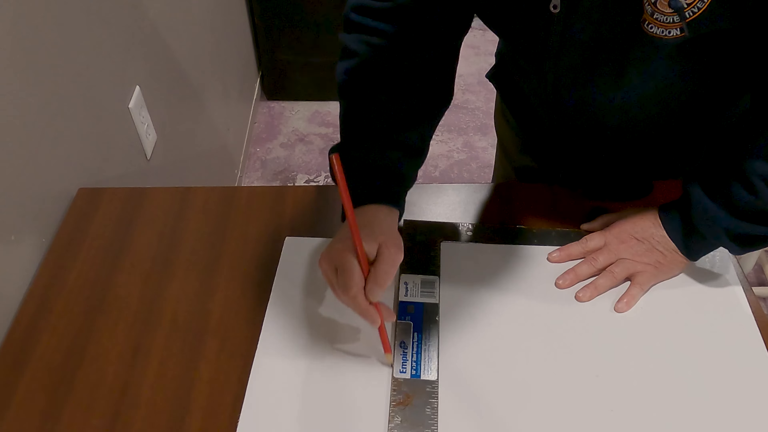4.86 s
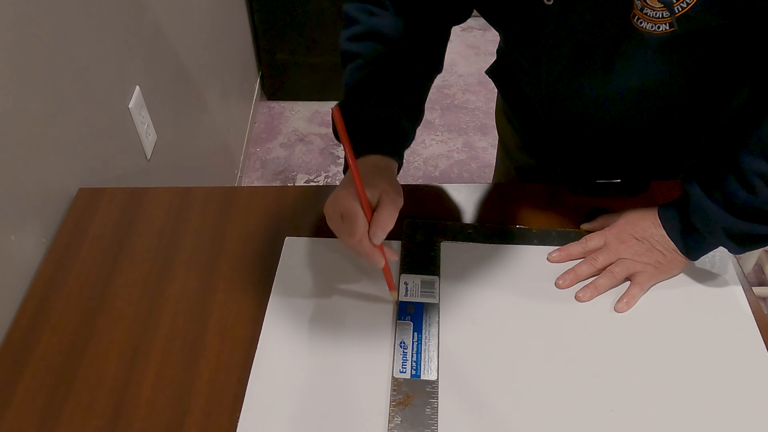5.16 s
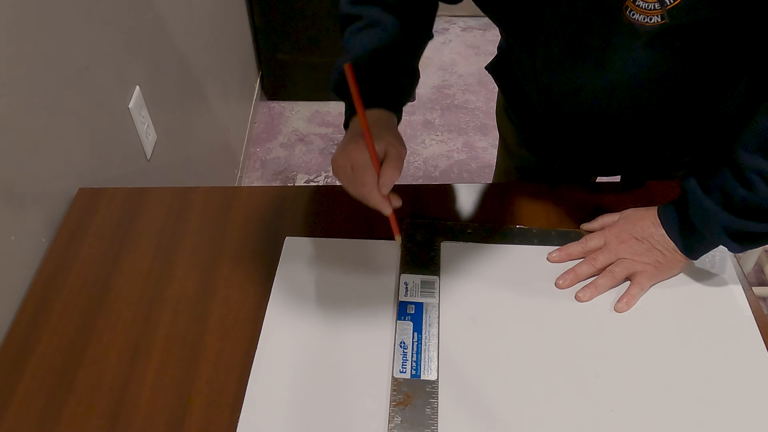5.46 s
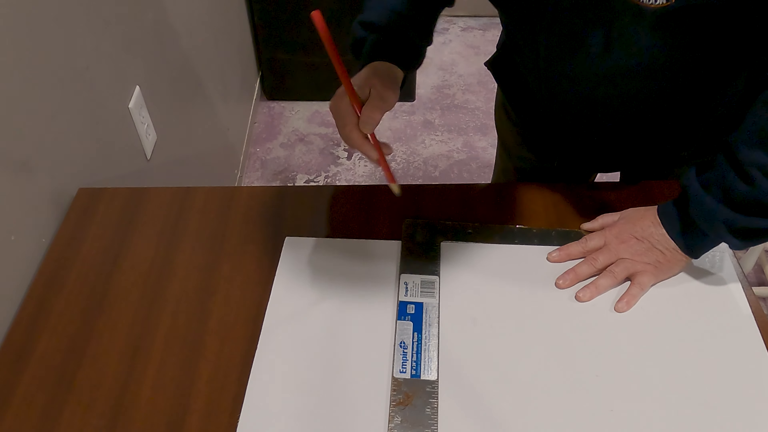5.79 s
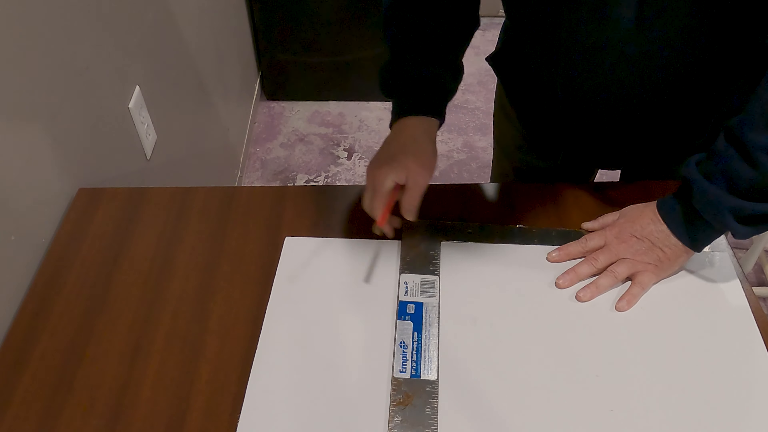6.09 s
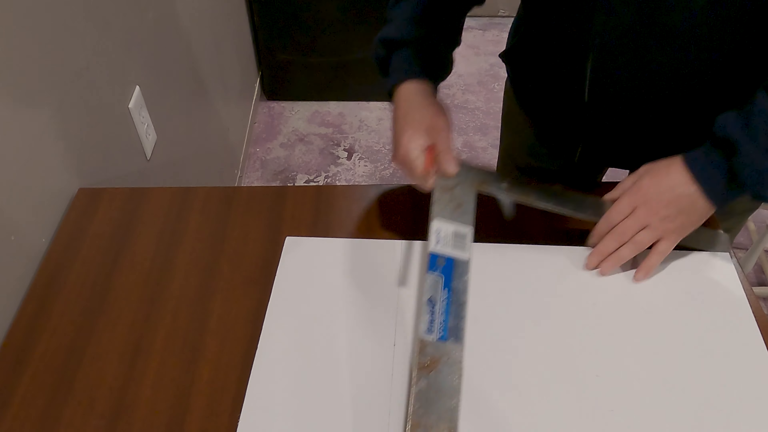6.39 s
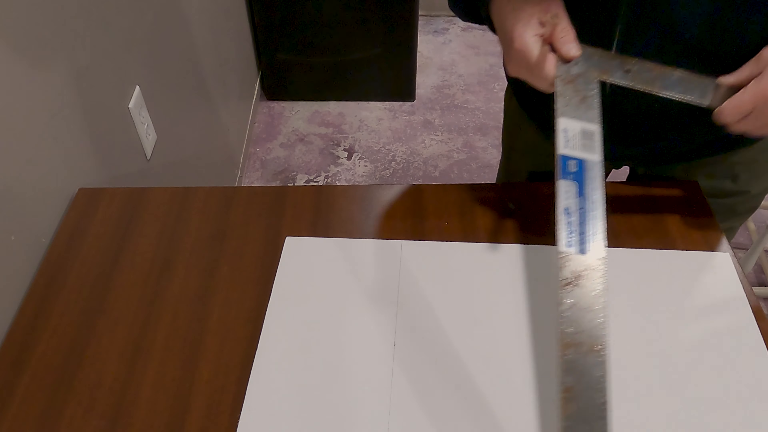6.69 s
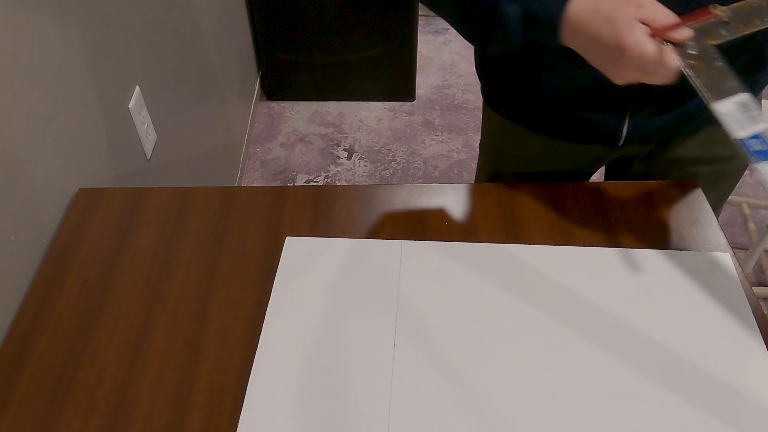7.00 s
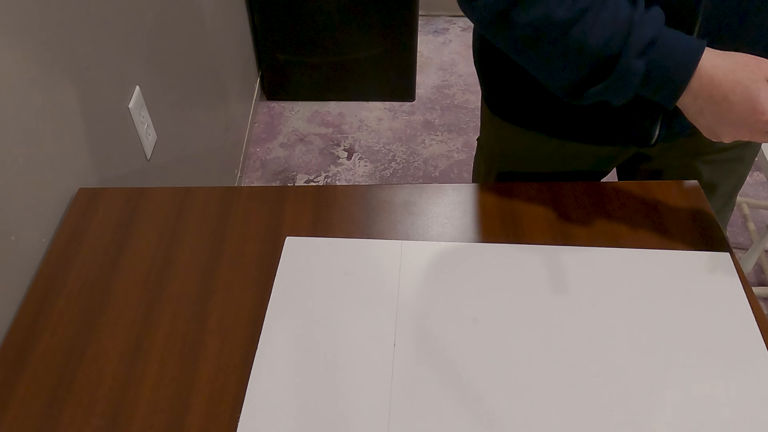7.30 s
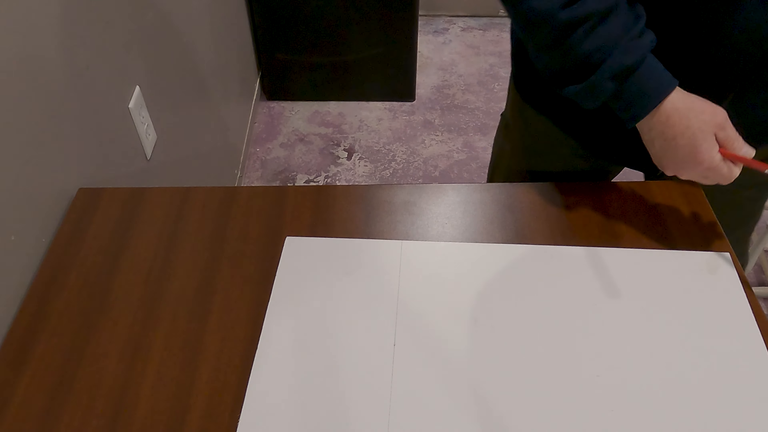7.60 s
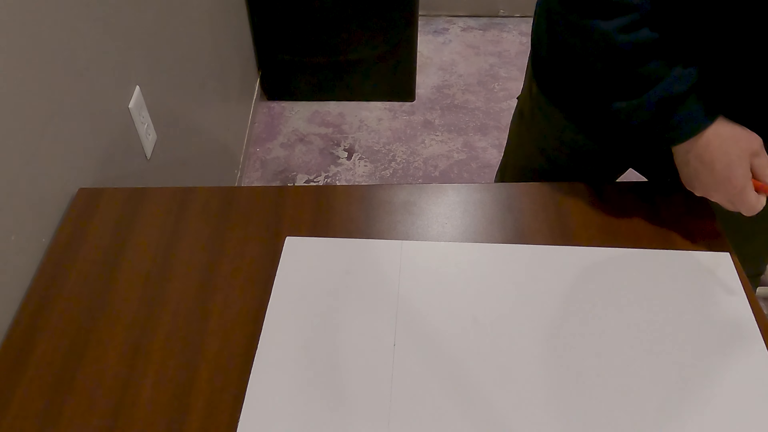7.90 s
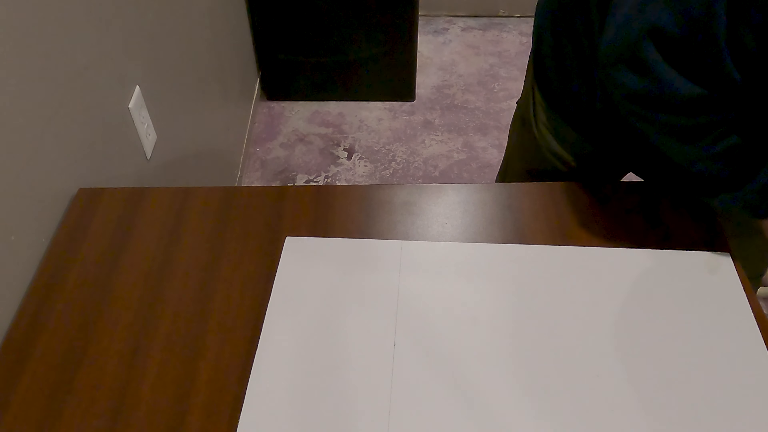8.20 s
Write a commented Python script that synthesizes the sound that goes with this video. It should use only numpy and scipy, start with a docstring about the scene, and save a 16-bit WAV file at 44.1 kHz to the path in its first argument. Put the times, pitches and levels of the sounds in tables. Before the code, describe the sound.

A metal ruler clacks and rattles on a wooden table, followed by soft hand bumps and faint scraping. A large thin board slides with a growing scrape and stops with a dull clack. The ruler drops onto it, ringing and chattering to rest. Finally the board is knocked about, bouncing with hollow booms. The sounds are close, in a small room with a faint rumble and hiss.

```python
"""A small carpeted room, where a metal ruler and a large thin board are handled on a wooden table.
The ruler clacks on the table and hands bump it: each impact excites damped modes. The board slides with
stick-slip friction until it meets an obstacle. The ruler drops on it and chatters to rest, ringing in
its bending modes. At last the board is knocked about and booms as the whole sheet flexes.
Close walls add a short reverberation, over a faint rumble and hiss."""
import sys
import numpy as np
from scipy import signal
from scipy.fft import rfft, irfft, next_fast_len
from scipy.io import wavfile
from scipy.ndimage import map_coordinates

SR = 44100
rng = np.random.default_rng(int(sys.argv[2]) if len(sys.argv) > 2 else 0)


def file_out(sig):
    """Save sig as 16-bit WAV at sys.argv[1]."""
    # one column per channel
    cols = np.atleast_2d(sig).T
    # limit, then scale
    lim = np.clip(cols, -1, 1)
    pcm = np.round(lim * 32767).astype(np.int16)
    wavfile.write(sys.argv[1], SR, pcm)


N = 372199
TIME = np.arange(N) / SR
AGE = np.arange(SR * 3 // 4) / SR  # time since an impact [s]


# the ruler lands on the board: (time [s], level [dB], share that shakes the board [dB])
RULER_LANDINGS = [(6.3946, -17, -9.5), (6.6609, -28.5, -33), (6.7285, -28.5, -40), (6.7476, -28.5, -49),
                  (6.8975, -29, -19)]
# contact spectra, bright and low: (frequency [Hz], level [dB])
RULER_CLICK = [(2000, 1.5), (3000, 5.5), (4300, 1), (5200, 4.5), (6600, 3.5), (8500, -6), (11000, -15.5),
               (15000, -31)]
RULER_CLANG = [(150, -27), (330, -1), (550, -0.5), (900, 2.5), (1400, 2), (2200, 0.5), (3000, -9.5),
               (4500, -41.5)]
# low and high ruler modes, board panel modes, whole-sheet modes: (frequency [Hz], level [dB], t60 [s])
BEND_MODES = [(746, 3.5, 0.36), (932, 2, 0.33), (1055, -1, 0.5), (1190, 3, 0.11), (1276, 4, 0.24),
              (1467, 3, 0.13), (1810, -15, 0.12), (1935, -3, 0.12), (2190, -14, 0.12), (2700, -14, 0.25)]
STEEL_MODES = [(4940, -3, 0.2), (4840, -0.5, 0.35), (5490, -3, 0.3), (6580, -6, 0.16), (6030, -6.5, 0.22),
               (6550, -18, 0.14), (7520, -7, 0.22), (7150, -21, 0.18), (7640, -16.5, 0.1), (8200, -18, .17),
               (9850, -25, 0.2), (10400, -20, 0.09), (11800, -23, .17)]
PANEL_MODES = [(126.3, 0, .3), (149.7, 3, 0.26), (206.1, -1, 0.3), (261, -5.5, 0.37), (330.5, -10, 0.33),
               (369.8, -11, 0.41), (407.1, -13.5, 0.42)]
FLEX_MODES = [(32.8, -6.5, .35), (43.3, -6, 0.22), (55.8, -0.5, 0.49), (58.37, -7, 0.36)]
def ruler_drops(click_db=-9, steel_db=-13, clang_db=-7, bend_db=-12, thud_db=-2, flex_db=-2, lag_s=.017):
    """Impact excitation: landing flat damps the strip, rebounds let it ring, and the board gives way."""
    out = np.zeros(N)
    onset = 1 - np.exp(-AGE[:SR // 2] / .0011)  # the contact spreads along the strip
    for k, (s, db, share) in enumerate(RULER_LANDINGS):
        damping = 3 if k == 0 else 1
        add(out, s, amp(db + click_db) * onset * burst(RULER_CLICK, t60=.055, crack_db=-13))
        add(out, s, amp(db + steel_db) * ring(STEEL_MODES, attack=.0038, damping=damping))
        add(out, s, amp(db + clang_db) * onset * burst(RULER_CLANG, t60=.31, crack_db=6.5))
        add(out, s, amp(db + bend_db) * ring(BEND_MODES, attack=.00068, damping=damping))
        add(out, s, amp(db + share + thud_db) * ring(PANEL_MODES, attack=.035))
        add(out, s + lag_s, amp(db + share + flex_db) * ring(FLEX_MODES, attack=.029))
    return out


# flurries of the fallen ruler: (peak time [s], clang level [dB], steel level [dB])
FLURRIES = [(6.442, -31.5, -34), (6.528, -23.5, -36), (6.612, -24.5, -34), (6.689, -39, -42.5),
            (6.755, -36.5, -39), (6.928, -50, -37)]
def ruler_chatter(bend_db=-3, clang_db=-6, steel_db=-6, click_db=-4, flex_db=-10, rise=.028, t60=.36):
    """Forced vibration: the whipping strip's uneven taps drive its own modes and those of the board."""
    out = np.zeros(N)
    taps = grains(rate=400, spread_db=2)
    for s, clang, steel in FLURRIES:
        span = slice(round(s * SR) - SR // 4, round(s * SR) + SR // 2)
        driven = lambda response: unit(signal.fftconvolve(taps[span], response)[:len(taps[span])])
        low = amp(bend_db) * driven(ring(BEND_MODES, attack=.001, damping=2.8))
        low += amp(clang_db) * driven(burst(RULER_CLANG, t60=.18, crack_db=5))
        low += amp(flex_db) * driven(ring(FLEX_MODES, attack=.0049))
        high = amp(steel_db) * driven(ring(STEEL_MODES, attack=.001, damping=2.8))
        high += amp(click_db) * driven(burst(RULER_CLICK, t60=.1, crack_db=7))
        out[span] += low * swells([(s, clang)], rise, t60)[span]
        out[span] += high * swells([(s, steel)], rise / 2, t60)[span]
    return out


# single blows on the board: (time [s], level [dB], hardness [dB])
BOARD_HITS = [(3.1578, -69.5, 15.5), (3.6249, -52.5, 16.5), (5.612, -34, -9.5), (6.1741, -36.5, -4.5),
              (6.2682, -46, -5), (7.4663, -65, 13), (8.2071, -26, -7.5), (8.2708, -23, -1.5)]
# falls on an edge: (time [s], level [dB], hardness [dB], ratio of successive flight times [1])
BOARD_FALLS = [(7.949, -20, -4, 0.88), (8.2577, -24.5, 0.5, .69)]
def board_contacts(count=5, flight_s=.052, loss_db=2, far_edge_db=-2.5, flat_db=3, edge_db=-5):
    """Inelastic rebound: lists blows and bounces as (time [s], level [dB], hardness [dB], thud [dB])."""
    contacts = [(s, db, hard, 0) for s, db, hard in BOARD_HITS]
    for s, db, hard, shrink in BOARD_FALLS:
        for k in range(count):
            far = far_edge_db * (k % 2)  # the board rocks from edge to edge
            thud = flat_db - far if k else edge_db  # rebounds land flat and thud more
            contacts.append((s, db - loss_db * k + far, hard, thud))
            s += flight_s * shrink ** k
    return sorted(contact for contact in contacts if contact[0] < N / SR)


# contact spectra of the board's edge and panel: (frequency [Hz], level [dB])
BOARD_CLICK = [(900, -6.5), (1900, 0.5), (2700, -8), (3600, -13.5), (4400, -13), (5300, -10.5), (7000, -18),
               (10000, -30.5), (14000, -44)]
BOARD_KNOCK = [(110, -24.5), (240, 1), (550, 0.5), (800, -5), (1300, -7), (1800, -19.5), (3000, -27.5)]
def board_knocks(click_db=-10, knock_db=-2, thud_db=-1, flex_db=-3, steel_db=-24, choke_s=.029):
    """Plate vibration: the struck sheet booms until the next contact damps it; the ruler rings along."""
    out = np.zeros(N)
    clicks = struck(BOARD_CLICK, t60=.33, crack_db=0, alike=.88)
    knocks = struck(BOARD_KNOCK, t60=.42, crack_db=0, alike=.45)
    contacts = board_contacts()
    gaps = np.diff([row[0] for row in contacts], append=np.inf)
    for (s, db, hard, thud), gap in zip(contacts, gaps):
        free = np.exp(-np.maximum(AGE - gap, 0) / choke_s)
        bend = .23 * min(db + 20.5, 0)  # blows below -20.5 dB bend the whole sheet less
        add(out, s, amp(db + hard + click_db) * next(clicks))
        add(out, s, amp(db + hard + steel_db) * ring(STEEL_MODES, attack=.002))
        add(out, s, amp(db + knock_db) * next(knocks))
        add(out, s, amp(db + thud + thud_db) * free * ring(PANEL_MODES, attack=.02))
        add(out, s, amp(db + thud + bend + flex_db) * free * ring(FLEX_MODES, attack=.016))
    return out


# the ruler strikes the table: (time [s], level [dB], hardness [dB])
TABLE_HITS = [(0.4677, -41.5, 1.5), (0.5054, -38.5, -2), (0.5212, -18, 4.5), (0.5499, -20, 2.5),
              (0.5669, -24.5, 0.5), (0.6411, -34.5, 2.5), (1.1521, -70.5, 17), (1.796, -48, 0),
              (1.8133, -51, -11)]
def table_blows(knee_db=-43.5, slope=.35):
    """Contact stiffness trades thud for click: lists (time [s], click [dB], knock [dB], thud [dB])."""
    knock = lambda db: 2.5 + min(db, knee_db + slope * (db - knee_db))  # grows slowly above the knee
    return [(s, db + hard, knock(db), db - hard) for s, db, hard in TABLE_HITS]


# contact spectra on the table: (frequency [Hz], level [dB])
TABLE_CLICK = [(900, -41.5), (1700, -3), (1950, 5.5), (2450, -2), (3100, 4), (3600, -6), (4250, -2),
               (6000, -8.5), (10000, -10.5), (13000, -14), (16000, -26.5)]
TABLE_KNOCK = [(120, -26.5), (260, -1), (350, 0.5), (560, 1), (900, -7), (1200, -7), (1600, -16),
               (2600, -28)]
# modes of the table top and of the ruler lying against it: (frequency [Hz], level [dB], t60 [s])
TABLE_MODES = [(111.5, 3, 0.24), (133, -5.5, 0.11), (178, -8.5, 0.22), (227, -9.5, 0.19),
               (257, -6.5, 0.099)]
CLACK_MODES = [(1225.3, -1, .14), (1884, -7.5, 0.083), (3050, -3.5, .08), (4240, 0.5, 0.073),
               (5070, -2.5, 0.097), (6480, -2, 0.065), (9540, -2, .07), (10500, -4, .07)]
HELD_BELOW_DB = -46.5  # softer clicks are made with the ruler still in the hand
def table_knocks(click_db=-10, steel_db=-16, knock_db=-1, thud_db=-.5, held_damping=1.7, held_hz=4200):
    """Free vibration: ruler and table top ring after each clack, less when a hand damps them."""
    out = np.zeros(N)
    clicks = struck(TABLE_CLICK, t60=.12, crack_db=2, alike=.39)
    knocks = struck(TABLE_KNOCK, t60=.17, crack_db=-2, alike=.49)
    for s, click, knock, thud in table_blows():
        held = click < HELD_BELOW_DB
        damping = held_damping if held else 1
        clack = amp(steel_db) * ring(CLACK_MODES, attack=.00092)
        add(clack, 0, amp(click_db) * next(clicks))
        if held:  # the fingers take the treble off
            clack = filtered(clack, lambda hz: 1 / np.hypot(1, (hz / held_hz) ** 2))
        add(out, s, amp(click) * clack)
        add(out, s, amp(knock + knock_db) * next(knocks))
        add(out, s, amp(thud + thud_db) * ring(TABLE_MODES, attack=.01, damping=damping))
    return out


def table_rattle(wood_db=-4, steel_db=-14, lag_s=.008):
    """Intermittent contact: each free clack leaves the ruler buzzing on the table in tiny rebounds."""
    free = [blow for blow in table_blows() if blow[1] >= HELD_BELOW_DB]
    wood = amp(wood_db) * swells([(s + lag_s, knock) for s, _, knock, _ in free], lag_s / 2, t60=.26)
    steel = amp(steel_db) * swells([(s + lag_s, click) for s, click, _, _ in free], lag_s / 2, t60=.22)
    taps = grains(rate=760, spread_db=3)
    return wood * unit(shaped(taps, TABLE_KNOCK)) + steel * unit(shaped(taps, TABLE_CLICK))


SLIDE_START_S, SLIDE_STOP_S, RUB_POWER = 4.3, 5.612, 1.33  # rubbing grows as this power of speed
def slide_speed(t, brake_s=.022):
    """Uniform acceleration: the board's speed rises from 0 to 1 until it is stopped."""
    return np.interp(t, [SLIDE_START_S, SLIDE_STOP_S, SLIDE_STOP_S + brake_s], [0, 1, 0])


# friction spectra of panel rub, harsh scrape under a firm push, and hiss: (frequency [Hz], level [dB])
SLIDE_RUB = [(53, -21), (90, -25.5), (176, -10.5), (202, -5.5), (345, 7), (452, -17), (666, -9.5),
             (729, -19), (912, -7), (1110, -16.5), (1630, -15), (2070, -23.5), (3200, -30.5), (4160, -46),
             (7040, -120)]
SLIDE_BITE = [(500, 9), (750, 8.5), (1000, 4.5), (1350, 6), (1900, -63)]
SLIDE_HISS = [(1470, -21), (2500, 3.5), (2740, -5), (2930, -5), (3630, -10), (4080, -6), (4890, -1),
              (6300, -7), (7510, -3.5), (8350, -13), (10000, -9), (11200, -19.5), (12800, -16),
              (14100, -34), (15500, -46)]
def board_slide(rub_db=-38, hiss_db=-51, bite_db=-44, echo=.32, glide=.06):
    """Stick-slip friction: tiny catches drive the board; a shifting reflection comb-filters the sound."""
    speed = slide_speed(TIME)
    catches = grains(rate=3500, spread_db=2)
    response = burst(SLIDE_RUB, t60=.047, crack_db=21, crack_t60=.0051)
    panel = amp(rub_db) * unit(signal.fftconvolve(catches, response)[:N])
    bite = amp(bite_db) * unit(shaped(catches, SLIDE_BITE))
    position = np.cumsum(1 + glide * (speed - .5))  # the hiss rises in pitch with speed
    hiss = amp(hiss_db) * unit(map_coordinates(shaped(catches, SLIDE_HISS), [position], mode="wrap"))
    sound = speed ** RUB_POWER * (panel + bite) + speed * hiss
    sound *= amp(wobble(22))  # the level flickers by about 1 dB
    delay_s = np.interp(TIME, [SLIDE_START_S, SLIDE_STOP_S], [.001745, .00139])
    return sound + echo * np.interp(TIME - delay_s, TIME, sound)


# catches of the sliding edge: (time [s], level [dB])
BOARD_SNAGS = [(4.8522, 2), (4.9319, 2), (5.2092, 4.5), (5.592, -3.5)]
def board_snags(click_db=-47, knock_db=-43):
    """Frictional impulses: the edge catches now and then, the harder the faster it moves."""
    out = np.zeros(N)
    for s, db in BOARD_SNAGS:
        click = amp(click_db) * burst(BOARD_CLICK, t60=.48, crack_db=6)
        knock = amp(knock_db) * burst(BOARD_KNOCK, t60=.16, crack_db=0)
        add(out, s, amp(db) * slide_speed(s) ** RUB_POWER * (click + knock))
    return out


# spectrum of the collision that ends the slide: (frequency [Hz], level [dB])
STOP_CLACK = [(150, -22), (450, 9.5), (800, -3.5), (1300, -1), (2100, -7), (3200, -20), (5200, -15),
              (9000, -28), (14000, -39)]
def board_stop(clack_db=-35):
    """Sudden deceleration: the board meets an obstacle with a dull clack."""
    out = np.zeros(N)
    add(out, SLIDE_STOP_S, amp(clack_db) * burst(STOP_CLACK, t60=.06, crack_db=-6))
    return out


# skids of the steel edge on the board: (time [s], level [dB])
SKIDS = [(6.732, -24.5), (6.926, -23.5)]
# their spectrum: (frequency [Hz], level [dB])
SKID_SPECTRUM = [(4700, -24), (5350, -3), (5570, 3), (5850, -19), (6150, -3), (6800, -12), (8500, -23)]
def ruler_squeaks(rise=.0066, t60=.03):
    """Stick-slip excitation: quick slips of the steel edge give a short bright squeak."""
    return swells(SKIDS, rise, t60) * unit(shaped(grains(rate=1800, spread_db=3.5), SKID_SPECTRUM))


# soft bumps on the table, from a hand or from the ruler settling after its last clack: (time [s], level [dB],
# firmness [dB])
SOFT_BUMPS = [(0.0, -53, -3), (0.092, -48.5, -7), (0.133, -54.5, -5), (0.713, -47.5, -28),
              (1.241, -53.5, -11.5), (1.277, -49, -32), (1.495, -47.5, -9), (1.721, -54.5, -9.5),
              (2.01, -53.5, -7), (2.398, -62.5, -4), (3.93, -63, -19)]
def soft_bumps(thud_db=2, press_s=.013):
    """Compliant contact: a hand, or the ruler coming to rest, loads the table slowly and damps it, so bumps
    swell and fade smoothly."""
    out = np.zeros(N)
    contact = (AGE / press_s * np.exp(1 - AGE / press_s)) ** 2
    for s, db, firm in SOFT_BUMPS:
        pat = unit(shaped(rng.standard_normal(len(AGE)), TABLE_KNOCK))
        top = ring(TABLE_MODES, attack=.0022)
        add(out, s, amp(db) * contact * (amp(firm) * pat + amp(thud_db) * top))
    return out


# ruler strokes on the board: (start [s], rise [s], fall [s], level [dB], resonance [Hz])
BOARD_STROKES = [(2.58, 0.23, .42, -66, 1350), (3.08, 0.22, 1, -63.5, 1620), (7.04, 0.066, 0.19, -51, 970)]
# their spectrum: (frequency [Hz], level [dB])
BOARD_SCRAPE = [(250, -13), (450, -0.5), (750, -6.5), (1350, 4.5), (1800, 0), (2600, -7.5), (3300, -15),
                (4200, -11.5), (7000, -7.5), (12500, -21)]
def ruler_on_board(scrape_db=-4, resonance_db=-5, width_hz=350):
    """Friction-driven resonance: the scraping ruler's pitch depends on where it is held."""
    strokes = [row[:-1] for row in BOARD_STROKES]
    out = amp(scrape_db) * rubbing(strokes, BOARD_SCRAPE, rate=4000, spread_db=5)
    slips = shaped(grains(rate=5000, spread_db=4.5), BOARD_SCRAPE)
    for start, rise, fall, db, hz in BOARD_STROKES:
        resonance = unit(signal.lfilter(*signal.iirpeak(hz, hz / width_hz, SR), slips))
        out += amp(db + resonance_db) * stroke(start, rise, fall) * resonance
    return out


# ruler strokes on the table: (start [s], rise [s], fall [s], level [dB])
TABLE_STROKES = [(0.0, .05, .16, -61.5), (0.29, .03, 0.53, -68.5), (1.12, 0.45, .45, -63.5),
                 (1.51, 0.055, 0.078, -63), (1.66, 0.11, 0.071, -64)]
# their spectrum: (frequency [Hz], level [dB])
TABLE_SCRAPE = [(500, -11.5), (1100, -1), (1800, -12.5), (2500, 2.5), (3300, -11.5), (4300, -4),
                (5800, -16), (8500, -18), (11000, -9.5), (15500, -18.5)]
def ruler_on_table():
    """Sliding friction: steel drawn lightly over wood scrapes faintly."""
    return rubbing(TABLE_STROKES, TABLE_SCRAPE, rate=5000, spread_db=4.5)


# hand strokes on the board: (start [s], rise [s], fall [s], level [dB])
HAND_STROKES = [(2.85, 0.059, 0.11, -70), (3.05, 0.05, 0.12, -66.5), (3.16, 0.079, 0.1, -64.5),
                (5.9, .04, 0.47, -70), (6.27, .11, 0.022, -55.5), (7.0, 0.061, 0.45, -58.5),
                (7.44, .16, 0.51, -55)]
# their spectrum: (frequency [Hz], level [dB])
SKIN_SPECTRUM = [(290, -32.5), (500, -18), (544, -12), (583, -15.5), (950, -8.5), (1220, 0), (2820, -3),
                 (4050, -6.5), (5280, -3), (12000, -23), (14000, -38)]
def hand_brush():
    """Skin friction: slips over the board come so densely that they merge into a hiss."""
    return rubbing(HAND_STROKES, SKIN_SPECTRUM, rate=13000, spread_db=2.5)


# reverberation time of the room: (frequency [Hz], t60 [s])
ROOM_DECAY = [(100, 0.33), (500, 0.23), (2000, 0.22), (6000, 0.17), (13000, 0.16)]
def room(x, wet_db, side_db, leftward, build_s=.0036):
    """Reverberation: direct sound plus diffuse reflections from close walls, as mid and side."""
    hz, t, noise = signal.stft(rng.standard_normal((2, SR // 2)), SR, nperseg=256)
    decay = amp(-60 * t / along(ROOM_DECAY, hz)[:, None])
    tail = signal.istft(noise * decay, SR, nperseg=256)[1]
    tail *= 1 - np.exp(-AGE[:tail.shape[1]] / build_s)
    tail /= np.linalg.norm(tail[0])
    walls = filtered(tail[0], lambda f: f / np.hypot(f, 350))  # the bass stays mostly direct
    mid = x + amp(wet_db) * signal.fftconvolve(x, walls)[:N]
    side = leftward * mid + amp(side_db) * signal.fftconvolve(x, tail[1])[:N]
    return np.array([mid, side])


# early and late background spectra, and the tones of a whine: (frequency [Hz], level [dB])
EARLY_NOISE = [(25, -6.5), (70, -6), (115, -1), (170, -11), (240, -2.5), (320, 0), (600, -9), (900, -12),
               (1500, -19), (4000, -17), (6000, -28), (9500, -25), (11400, -17.5), (12500, -21),
               (16000, -24)]
LATE_NOISE = [(25, 1.5), (60, -2.5), (90, -4), (200, 3.5), (300, -4.5), (430, -1), (700, -13.5),
              (1600, -10), (2800, -21), (4300, -22), (5700, -13), (7300, -13), (9000, -24), (15000, -33.5)]
WHINE_TONES = [(5550, -84.5), (5800, -85)]
def background(early_db=-72.5, late_db=-70.5, switch_s=2.15):
    """Ambient noise, as mid and side: rumble and hiss switch colour at 2.15 s, and from then on a thin wavering
    whine sounds."""
    noise = lambda spectrum: unit(shaped(rng.standard_normal((2, N)), spectrum))
    whine = sum(amp(db) * unit(np.sin(2 * np.pi * hz * TIME + .67 * wobble(60)))
                for hz, db in WHINE_TONES)
    late = amp(late_db) * noise(LATE_NOISE) + np.outer([1, 0], whine)
    return np.where(TIME < switch_s, amp(early_db) * noise(EARLY_NOISE), late)


def ring(modes, attack, damping=1):
    """Modal superposition: damped sinusoids, at new strengths for every blow, start near rms 1."""
    hz, db, t60 = np.transpose(modes)[:, :, None]
    level = amp(db + 2 * rng.standard_normal(hz.shape) - 60 * damping * AGE / t60)
    level *= 1 - np.exp(-AGE / attack)
    power = np.mean(level[:, :SR // 30] ** 2, axis=1).sum() / 2
    phase = rng.uniform(0, 2 * np.pi, hz.shape)
    return (level * np.sin(2 * np.pi * hz * AGE + phase)).sum(0) / np.sqrt(power)


def burst(spectrum, t60, crack_db, crack_t60=.015):
    """Modal overlap: a crack, then crowded modes decaying as noise; rms 1 over the first 1/30 s."""
    t = AGE[:SR // 2]
    envelope = amp(-60 * t / t60) + amp(crack_db - 60 * t / crack_t60)
    blow = shaped(rng.standard_normal(len(t)) * envelope, spectrum)
    return blow / np.sqrt(np.mean(blow[:SR // 30] ** 2) + 1e-20)


def struck(spectrum, t60, crack_db, alike):
    """Partial correlation: blows on one body share part of their response; the rest varies by spot."""
    common = burst(spectrum, t60, crack_db)
    while True:
        yield np.sqrt(alike) * common + np.sqrt(1 - alike) * burst(spectrum, t60, crack_db)


def rubbing(strokes, spectrum, rate, spread_db):
    """Friction noise: a dense stream of tiny slips follows the pressure of each stroke."""
    pressure = sum(amp(db) * stroke(start, rise, fall) for start, rise, fall, db in strokes)
    return pressure * unit(shaped(grains(rate, spread_db), spectrum))


def grains(rate, spread_db):
    """Poisson process: tiny impacts of uneven size, rate a second."""
    hit = rng.random(N) < rate / SR
    return unit(hit * rng.choice([-1, 1], N) * amp(spread_db * rng.standard_normal(N)))


def stroke(start, rise, fall):
    """Triangular envelope: pressure builds to 1 and eases off."""
    return np.interp(TIME, [start, start + rise, start + rise + fall], [0, 1, 0])


def swells(peaks, rise, t60):
    """Incoherent addition: envelopes that peak at (time [s], level [dB]) add in power."""
    power = np.zeros(N)
    for s, db in peaks:
        onset = np.exp(-(np.minimum(TIME - s, 0) / rise) ** 2 / 2)
        decay = amp(db - 60 * np.maximum(TIME - s, 0) / t60)
        power += (onset * decay) ** 2
    return np.sqrt(power)


def wobble(rate):
    """Spline interpolation: a smooth random curve, rate knots a second."""
    return map_coordinates(rng.standard_normal(int(N * rate / SR) + 4), [np.arange(N) * rate / SR])


def filtered(x, response):
    """Minimum-phase filtering: apply a gain over frequency causally."""
    size = 2 * next_fast_len(x.shape[-1] // 2 + 4096)
    gain = response(np.fft.rfftfreq(size, 1 / SR))
    cepstrum = irfft(np.log(np.maximum(gain, 1e-6)))
    cepstrum[1:size // 2] *= 2
    cepstrum[size // 2 + 1:] = 0
    return irfft(rfft(x, size) * np.exp(rfft(cepstrum)))[..., :x.shape[-1]]


def shaped(x, spectrum):
    """Spectral shaping: filter x by a spectrum that falls 30 dB an octave beyond its ends."""
    def gain(hz):
        octaves = np.log2((hz + 1) / np.clip(hz + 1, spectrum[0][0], spectrum[-1][0]))
        return amp(along(spectrum, hz) - 30 * np.abs(octaves))
    return filtered(x, gain)


def along(points, hz):
    """Interpolation on a logarithmic frequency axis."""
    frequencies, values = np.transpose(points)
    return np.interp(np.log(hz + 1), np.log(frequencies + 1), values)


def amp(db):
    """Decibels to amplitude ratio."""
    return 10 ** (np.asarray(db) / 20)


def unit(x):
    """Normalisation to rms 1."""
    return x / np.sqrt(np.mean(x ** 2) + 1e-20)


def add(track, s, sound):
    """Superposition: mix a sound into the track at time s."""
    start = max(0, round(s * SR))
    track[start:start + len(sound)] += sound[:N - start]


# stereo width: (frequency [Hz], side gain [dB])
SIDE_GAIN = [(50, -32.5), (125, -21.5), (250, -12), (500, -8), (1000, -5.5), (2000, -3), (5000, -4.5),
             (12000, -4)]
def scene():
    """Spatial coherence: all sources share one room; long waves reach two close microphones alike."""
    hand = hand_brush()
    scrape = ruler_on_table()
    table = table_knocks() + table_rattle() + soft_bumps() + scrape
    table = room(table, wet_db=-10, side_db=-6, leftward=-.05)
    board = board_knocks() + board_slide() + board_snags() + board_stop() + hand + ruler_on_board()
    board = room(board, wet_db=-9, side_db=-4.5, leftward=.15)
    ruler = ruler_drops() + ruler_chatter() + ruler_squeaks()
    ruler = room(ruler, wet_db=-3.5, side_db=-4.5, leftward=.22)
    mid, side = table + board + ruler + background()
    side = filtered(side, lambda hz: amp(along(SIDE_GAIN, hz)))
    return np.array([mid + side, mid - side])


def record(dry):
    """Band limiting: a steep low-pass removes the treble above 15.8 kHz."""
    return signal.sosfilt(signal.ellip(10, .1, 90, 15800, fs=SR, output="sos"), dry)


dry = scene()
out = record(dry)
file_out(out)
```